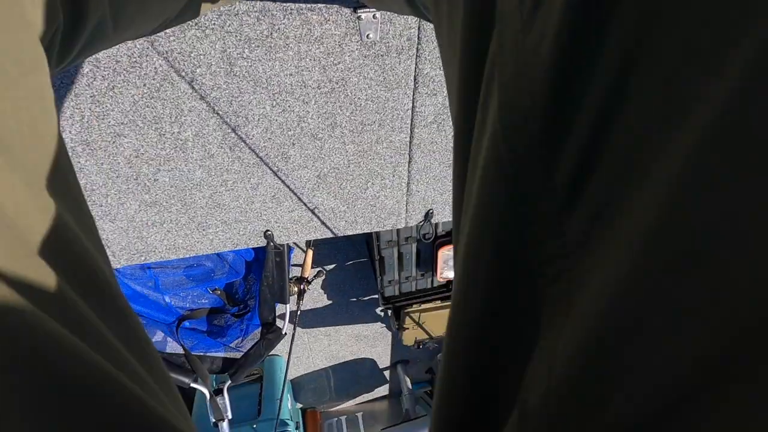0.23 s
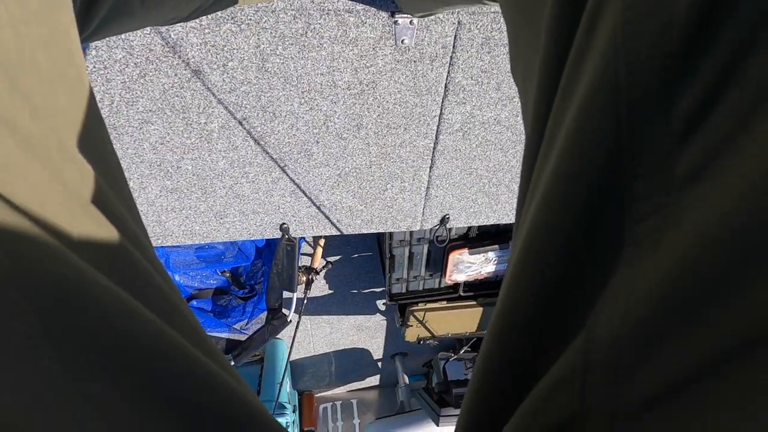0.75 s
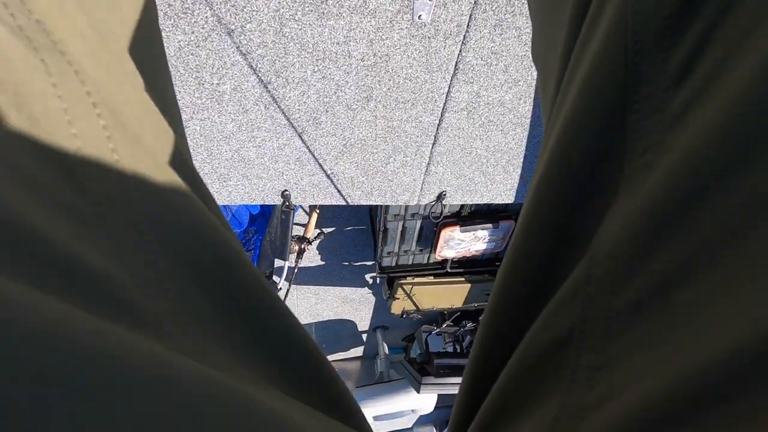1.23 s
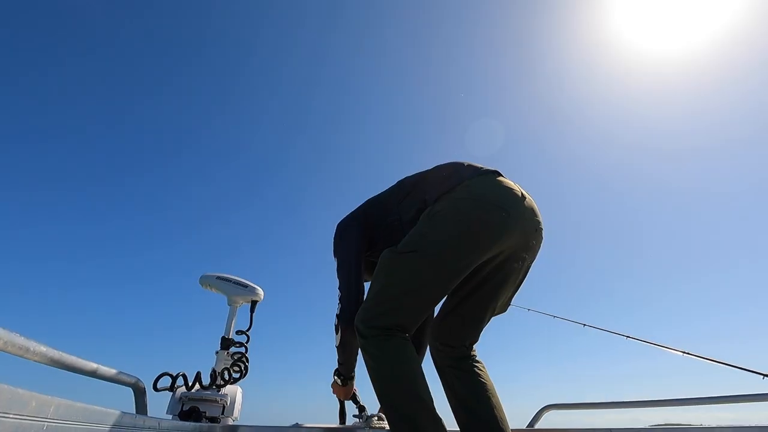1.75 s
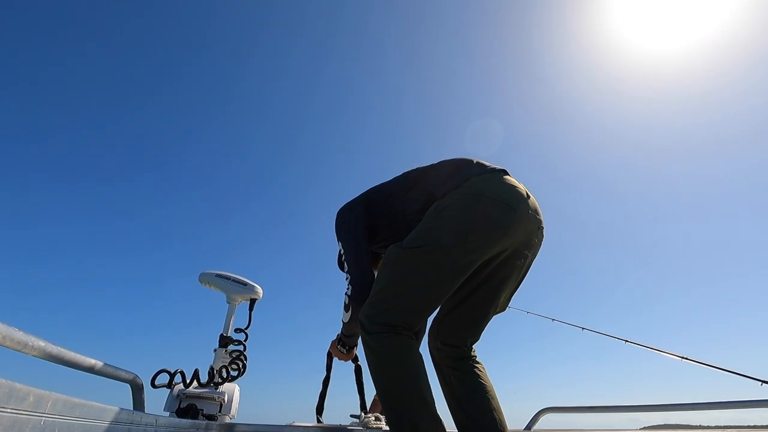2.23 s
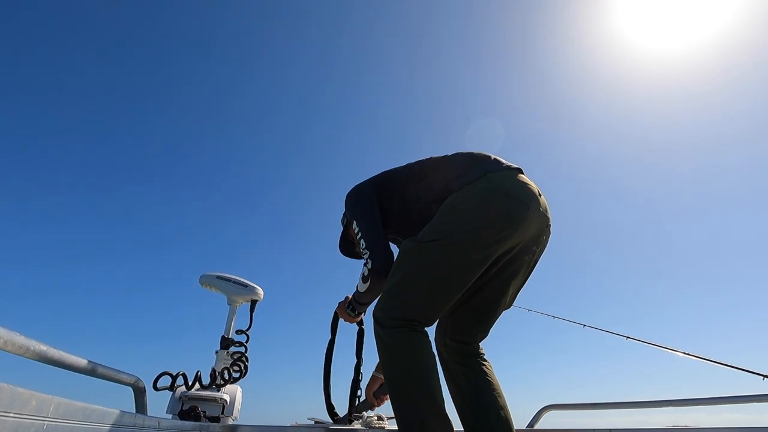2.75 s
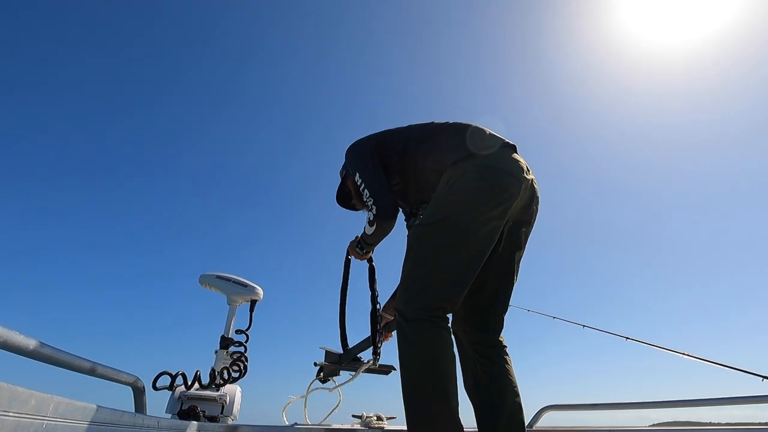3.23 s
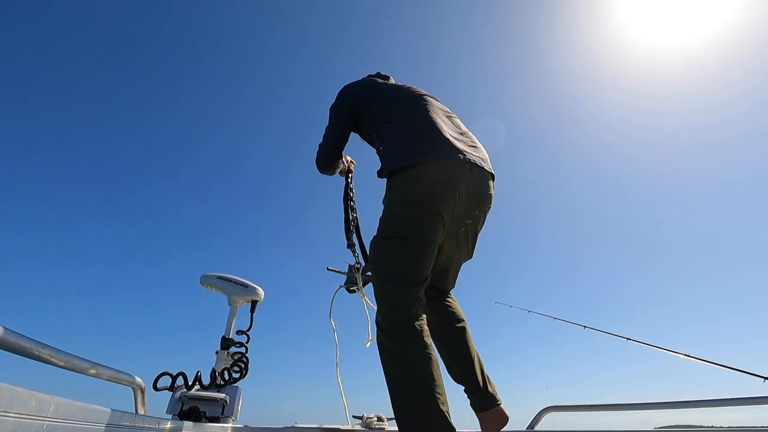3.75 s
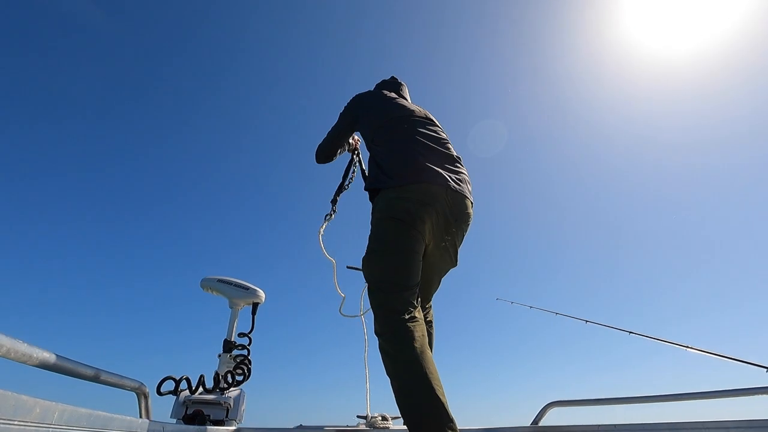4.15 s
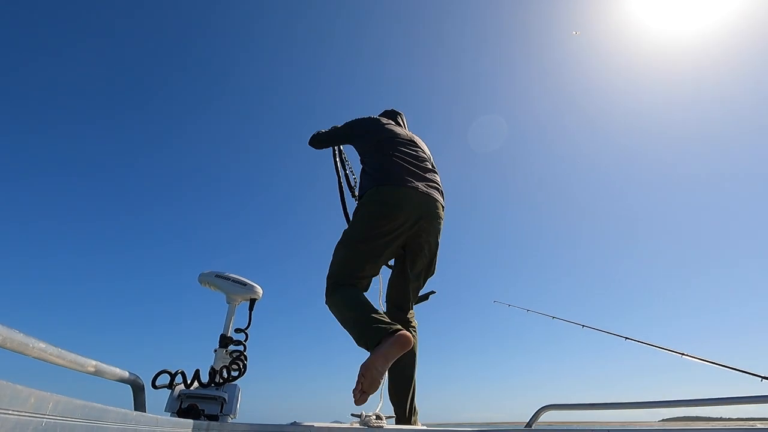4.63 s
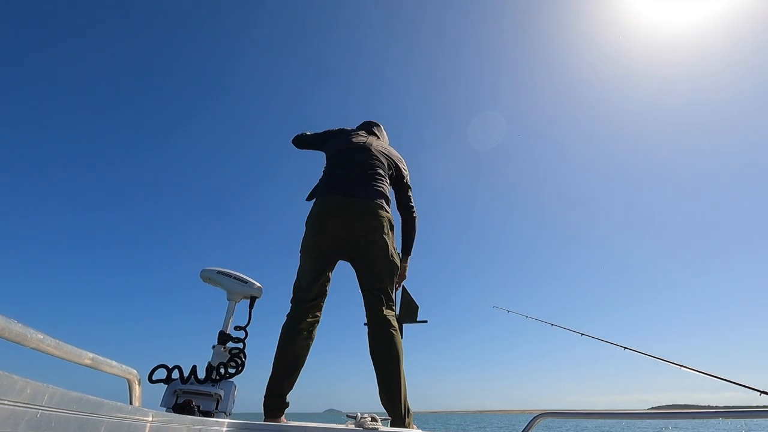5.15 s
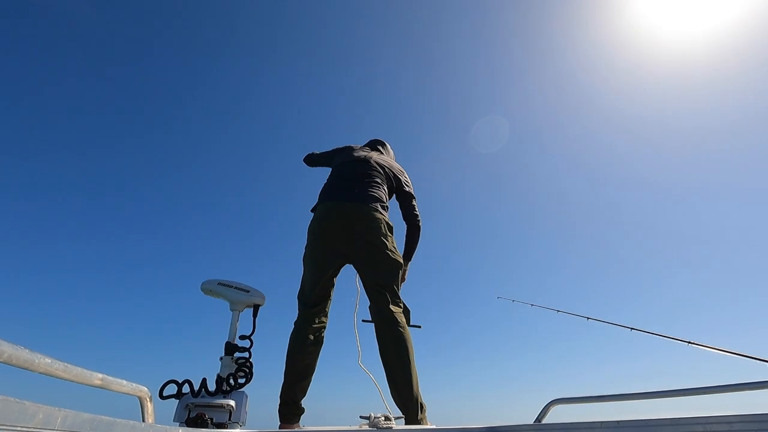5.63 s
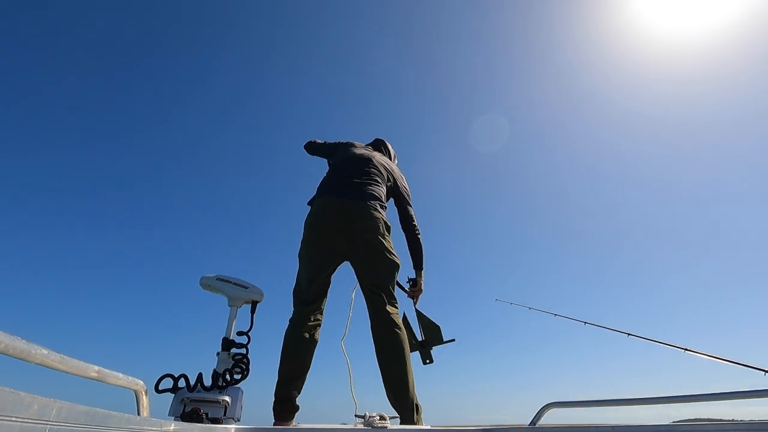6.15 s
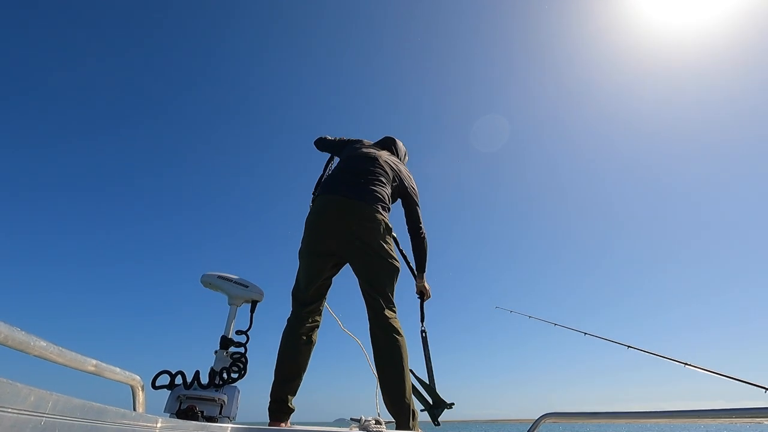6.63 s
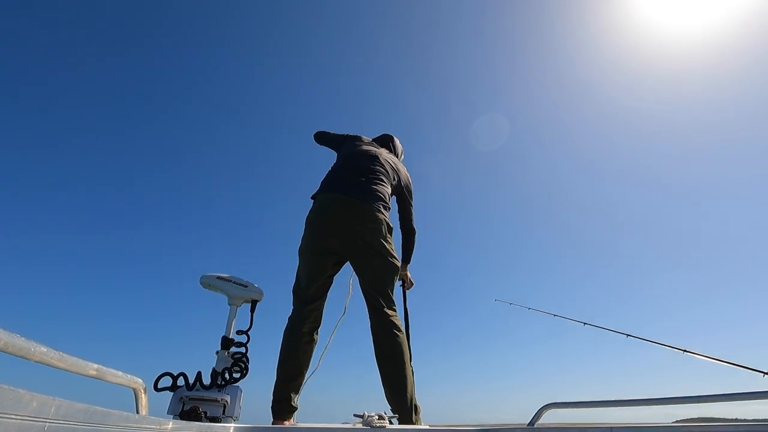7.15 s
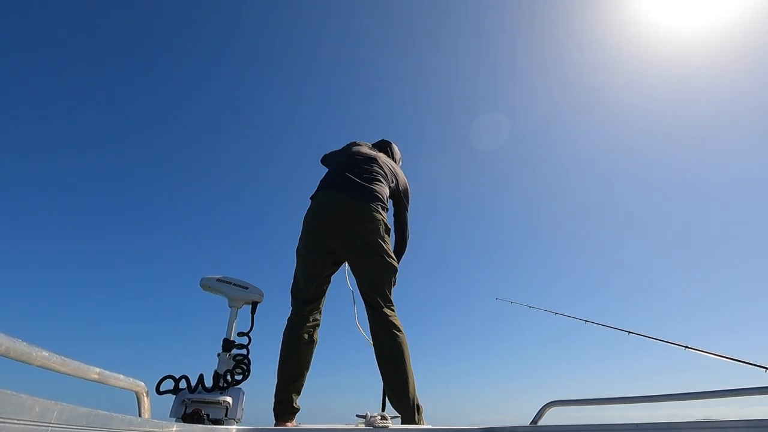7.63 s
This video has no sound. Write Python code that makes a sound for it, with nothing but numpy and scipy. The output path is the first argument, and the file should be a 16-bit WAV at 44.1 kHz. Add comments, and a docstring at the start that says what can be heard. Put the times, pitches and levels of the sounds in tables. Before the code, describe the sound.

Metal anchor gear clangs and scrapes on an aluminium boat's bow, links ticking, deck knocking, cloth rustling under soft wind rumble.

```python
"""Anchor over the bow

A steel anchor and its chain are lifted from the deck locker of a small metal boat and let down over the bow.
The anchor clangs (fading sine modes) and scrapes (gritty noise through the same modes).
Links tick on the rail (click and short ring) and the hull thuds under feet and gear (low fading sines).
Wind buffets the microphone (low noise), water and clothing rustle (noise with tiny knocks),
and a faint squeak (gliding sines) joins in."""
import sys
import numpy as np
from scipy import signal
from scipy.fft import rfft, irfft, next_fast_len
from scipy.io import wavfile
from scipy.ndimage import uniform_filter1d, map_coordinates

SR = 44100
rng = np.random.default_rng(int(sys.argv[2]) if len(sys.argv) > 2 else 0)


def level_to_linear(level):
    """Convert decibel levels to linear amplitude factors, elementwise."""
    exponent = np.asarray(level, float) / 20
    return 10 ** exponent


def unload_audio(sound):
    """Save the sound as a 16-bit wav file, at the path given as the first command line argument."""
    columns = np.transpose(np.atleast_2d(sound))
    # keep every value between -1 and 1, then stretch to whole-number steps
    steps = np.round(np.clip(columns, -1, 1) * 32767)
    wavfile.write(sys.argv[1], SR, steps.astype(np.int16))


N = 348390

# wind buffeting over time: t/s, level/dB
WIND_LEVEL = [(0, -41), (0.9, -40), (1.5, -44), (2.2, -41.5), (3.3, -43.5), (3.9, -37.5), (4.75, -42.5),
              (5.0, -50), (7.9, -51)]
# colour of the wind noise: f/Hz, relative level per Hz/dB
WIND_COLOUR = [(12, -4.5), (24, 6), (70, -1), (260, -12), (440, -120)]
# stir of rope, chain and cloth, with sudden lulls and starts: t/s, hull scuffing level/dB, rustle level/dB
STIR = [(0, -53, -54), (0.6, -47, -61.5), (1.4, -46, -57), (1.55, -65.5, -64.5), (1.62, -44, -62),
        (2.2, -47.5, -57), (3.12, -48.5, -55), (3.44, -63, -57), (4.3, -56, -54.5), (4.98, -51, -67.5),
        (5.5, -56, -51.5), (6.4, -48.5, -56.5), (6.5, -65.5, -69), (6.63, -47, -58.5), (7.05, -52.5, -59),
        (7.27, -78, -77), (7.36, -44, -48), (7.9, -49.5, -62.5)]
# feet and gear scuffing the deck: peak t/s, rise over 20 dB/s, fall over 20 dB/s, hull level/dB, rustle level/dB
SCUFF_SWELLS = [(0.193, 0.0084, 0.16, -29.5, -57), (0.387, 0.036, 0.25, -27.5, -63),
                (3.515, 0.11, 0.43, -43.5, -51), (3.774, 0.2, 0.074, -37, -47.5),
                (3.907, 0.058, 0.12, -33.5, -44.5), (4.195, 0.11, 0.08, -41, -48),
                (4.703, 0.22, 0.18, -30, -51), (5.487, 0.017, 0.048, -35, -46),
                (7.552, 0.31, 0.26, -55, -50.5)]
# colour of the scuffing carried by the hull: f/Hz, relative level per Hz/dB
HULL_COLOUR = [(59, 0), (100, -8), (309, -0.5), (600, -11.5), (2000, -37), (4400, -120)]
# colour of the rustle: f/Hz, relative level per Hz/dB
RUSTLE_COLOUR = [(410, -42.5), (700, -2.5), (1130, -11), (1800, -7.5), (4500, -11), (9000, -24.5),
                 (15800, -46)]
# the anchor's modes: f/Hz, relative level/dB, time to fade 60 dB when neither damped nor freed/s
ANCHOR_MODES = [(810, -17, .15), (1278, -7, .2), (1352, -5, .5), (1392, -4, .2), (1511, -2, .12),
                (1962, 0, .25), (2295, -6, .15), (2655, -7, .2), (3090, -8, .4), (3378, -8, .5),
                (3700, -4, .17), (3742, -4, .25), (4185, -8, .2), (4487, -3, .09), (4638, -4, .2),
                (4984, -.5, .3), (5483, -5, .3), (5782, -4, .25), (6230, -4, .16), (6800, -5, .18),
                (7205, -6, .18), (7520, -3, .12), (8260, -6, .12)]
# edges of the five families of modes, which each strike point drives differently: f/Hz
FAMILY_EDGES = [500, 1700, 2850, 4300, 5600, 10500]
# blows on the anchor, and one soft scrape at 6.04 s:
# t/s, relative level of the lowest family/dB, tilt per family/dB, favoured f/Hz, its lift/dB
CONTACTS = [(0.484, -38.5, -2.5, 4740, 19), (0.6482, -31, -2, 4470, 12), (0.7305, -41.5, -1.5, 4780, 20),
            (0.8311, -36.5, -1, 4700, 14.5), (1.032, -31.5, -2.5, 1330, 11), (1.184, -20.5, -1.5, 4720, 16),
            (1.221, -31, -19, 1500, 7), (1.256, -30, -6.5, 1590, 0), (1.304, -28, -0.5, 1962, 20),
            (1.4117, -43.5, -3.5, 3260, 24.5), (1.6205, -35.5, -7.5, 1962, 3),
            (1.654, -41.5, -4.5, 1962, 4.5), (1.702, -51, -1.5, 4470, 19), (1.754, -50.5, -4.5, 1460, 19),
            (1.8523, -37, -7.5, 1430, 4.5), (1.938, -43.5, -5, 1962, -1), (2.1, -42.5, -2.5, 3360, 10),
            (2.6806, -39.5, -8, 1460, 16.5), (2.6933, -41.5, -1.5, 4970, 21),
            (2.9163, -49.5, -1, 1330, 17.5), (3.039, -41, -5, 1500, 11.5), (4.2083, -32.5, -2.5, 3850, 8),
            (4.362, -35, -3, 5000, 6), (4.5432, -24, -6, 2000, 6.5), (4.793, -25, -3, 3400, 4),
            (5.1327, -25.5, -3.5, 1380, 2), (5.325, -34, -4.5, 5000, 14), (5.6429, -30.5, -1.5, 6000, 12.5),
            (5.7131, -28.5, -1, 7650, 9.5), (5.747, -31, -0.5, 3300, 7.5), (5.779, -16, -5.5, 1616, 13.5),
            (5.9198, -29, -4.5, 2350, 15), (6.0364, -33, -6, 1900, 1), (6.0658, -30.5, -5.5, 2100, 9),
            (6.333, -39.5, -6.5, 1300, 3.5)]
# thuds in the hull: t/s, relative level/dB, f/Hz
HULL_THUDS = [(0.487, -25, 246), (0.73, -24, 257), (0.839, -21.5, 259.5), (0.864, -19.5, 277.4),
              (1.034, -20.5, 278), (1.187, -11.5, 274), (1.228, -10.5, 281), (1.307, -21.5, 280),
              (1.582, -23, 402), (1.717, -16, 250), (1.974, -31, 331), (2.131, -28, 171.4),
              (2.266, -28.5, 760), (2.392, -27, 392), (2.992, -33.5, 193), (3.727, -17.5, 778),
              (4.485, -28.5, 507), (4.795, -21, 754), (5.778, -28, 820), (6.064, -28.5, 572),
              (6.625, -30, 483), (6.683, -33.5, 242), (7.023, -36.5, 583), (7.635, -27.5, 317)]
# links and rope fittings ticking on the rail: t/s, relative level/dB, f/Hz
RAIL_TICKS = [(2.496, -27, 7400), (2.532, -33, 8000), (2.582, -25, 7960), (2.781, -8, 8070),
              (2.787, -11, 8400), (2.819, -20.5, 8430), (3.758, -21.5, 1420), (3.883, -25.5, 1590),
              (5.477, -24, 8200), (5.571, -37.5, 6900), (5.658, -5.5, 5900), (5.923, -36.5, 8900),
              (5.96, -40, 8500), (5.995, -39, 7450), (6.103, -41, 9000), (6.892, -28.5, 8300),
              (7.325, -24, 4250), (7.371, -12, 3610), (7.386, -27, 890), (7.409, -24.5, 3040),
              (7.445, -29, 4870), (7.474, -12.5, 1420), (7.501, -22, 4670), (7.537, -21.5, 4000),
              (7.567, -20, 5420), (7.625, -31.5, 3670), (7.675, -35, 3530), (7.719, -28, 2670),
              (7.739, -20, 3350), (7.87, -38, 7060)]
# the anchor dragged over metal: t/s, relative level/dB
DRAG_LEVEL = [(2.52, -54), (2.6, -38.5), (2.645, -31.5), (2.7, -33.5), (2.76, -52.5)]
# the gliding squeak: t/s, f/Hz, level/dB
SQUEAK_GLIDE = [(4.22, 1090, -59), (4.34, 895, -59), (4.485, 985, -57)]
# side against mid while the sound is almost mono: f/Hz, level/dB
NARROW_SIDE = [(10500, -33), (12000, 0)]
# side against mid once the sound has opened out: f/Hz, level/dB
WIDE_SIDE = [(100, -21), (400, -23), (3000, -9.5), (12000, -4)]
# start and end of the opening out: t/s
OPENING = (5.4, 6.86)


def unit(x):
    """Scaled to rms 1."""
    return x / np.sqrt(np.mean(x ** 2) + 1e-20)


def along(points, hz):
    """Reads (Hz, value) points on a log frequency axis."""
    f, v = np.transpose(points)
    return np.interp(np.log(hz + 1), np.log(f + 1), v)


def curves(rows):
    """One value per sample for each column after the time; -120 outside the listed times."""
    s, *columns = np.transpose(rows)
    t = np.arange(N) / SR
    return [np.interp(t, s, c, left=-120, right=-120) for c in columns]


def wobble(rate):
    """A smooth random curve with rate knots a second."""
    knots = rng.standard_normal(int(N * rate / SR) + 4)
    return map_coordinates(knots, [np.arange(N) * rate / SR])


def filtered(x, response):
    """x passed through a complex response, given as a function of frequency."""
    m = next_fast_len(N + SR // 2)
    return irfft(rfft(x, m) * response(np.fft.rfftfreq(m, 1 / SR)), m)[..., :N]


def band(x, lo_hz, hi_hz):
    """Causal band-pass."""
    return signal.sosfilt(signal.butter(2, [lo_hz, hi_hz], "band", fs=SR, output="sos"), x)


def fade(t, seconds):
    """Exponential decay that falls 60 dB in the given time."""
    return level_to_linear(-60 * t / seconds)


def soft_start(t, seconds):
    """Rounded onset: a gain rising from 0 towards 1."""
    return 1 - np.exp(-t / seconds)


def add(track, s, sound):
    """Mixes a sound into the track at s seconds."""
    part = track[..., round(s * SR):round(s * SR) + sound.shape[-1]]
    part += sound[..., :part.shape[-1]]


def rush(spectrum, patchy_db, envelope):
    """Coloured noise of rms 1 under an envelope, with random patches of gain in time and pitch."""
    z = signal.stft(rng.standard_normal(N) * envelope, nperseg=256)[2]
    field = uniform_filter1d(rng.standard_normal(z.shape), 5, 0)
    field = uniform_filter1d(field, 6, 1)
    x = signal.istft(z * level_to_linear(patchy_db * unit(field)), nperseg=256)[1][:N]
    return unit(filtered(x, lambda hz: level_to_linear(along(spectrum, hz))))


def grains(rate, mid_hz, spread, cycles, size_db):
    """Random small contacts, together of rms 1, each a damped ring at its own pitch; rate is per second."""
    draw = rng.random((round(rate * N / SR), 3))
    hz = mid_hz * np.exp(spread * rng.standard_normal((len(draw), 1)))
    hz = np.clip(hz, 100, SR / 3)
    t = np.arange(round(0.038 * SR)) / SR
    size = level_to_linear(-size_db * np.log(0.0032 + draw[:, 1:2]))  # a few are much larger than the rest
    sign = np.sign(draw[:, 2:] - .5)
    rings = sign * size * np.sin(2 * np.pi * hz * t)
    rings *= fade(t, cycles / hz) * soft_start(t, 2 / hz)
    at = (draw[:, :1] * N).astype(int) + np.arange(len(t))
    return unit(np.bincount(at.ravel(), rings.ravel(), minlength=N)[:N])


def wind():
    """Lumps of low pressure on the microphone: low noise with uneven strength."""
    lumps = rush(WIND_COLOUR, patchy_db=1.5, envelope=level_to_linear(6.2 * wobble(16)))
    return level_to_linear(curves(WIND_LEVEL)[0] + 1.3 * wobble(11)) * lumps


def stirring():
    """Hull and rustle levels in dB: the stir, with sudden lulls and starts, and every scuff swelling out of it."""
    t = np.arange(N) / SR
    power = level_to_linear(2 * np.array(curves(STIR)))  # doubled dB turn amplitude into power
    for s, rise, fall, *db in SCUFF_SWELLS:
        drop_db = 20 * np.maximum((s - t) / rise, (t - s) / fall)
        power += level_to_linear(2 * (np.array(db)[:, None] - drop_db))
    return 10 * np.log10(power)


def shuffle():
    """Scuffing carried by the hull and a rustle of rope, links and cloth: noise full of small knocks."""
    hull_db, rustle_db = stirring()
    unrest = wobble(26)

    scuff = rush(HULL_COLOUR, patchy_db=2.0, envelope=level_to_linear(4.2 * wobble(60)))
    knocks = grains(rate=160, mid_hz=571.0, spread=0.498, cycles=31.0, size_db=5)
    hull = level_to_linear(hull_db + 0.27 * unrest) * (scuff + 0.39 * knocks)

    rustle = rush(RUSTLE_COLOUR, patchy_db=1.5, envelope=level_to_linear(1.5 * wobble(120)))
    crackle = grains(rate=77, mid_hz=5900, spread=0.58, cycles=3.5, size_db=3.0)
    rattle = grains(rate=700, mid_hz=1900, spread=0.666, cycles=33, size_db=5.0)
    brisk = level_to_linear(1.1 * (rustle_db + 53))  # brisker movement rattles more
    cloth = rustle + brisk * (rattle + 0.19 * crackle)
    return hull + level_to_linear(rustle_db + 2.0 * unrest) * cloth


def chatter(count, t):
    """Uneven gain for each mode, 70 knots a second: loose parts touch the ringing steel."""
    knot, part = np.divmod(t * 70, 1)
    knot = knot.astype(int)
    gain = level_to_linear(4.47 * rng.standard_normal((count, knot[-1] + 2)))
    return gain[:, knot] * (1 - part) + gain[:, knot + 1] * part


def link_rings(level_db, t):
    """Sixteen links and shackles ring briefly at random pitches of their own."""
    draw = rng.random((16, 2))
    hz = 700 * 15 ** draw[:, :1]
    family = np.searchsorted(FAMILY_EDGES[:-1], hz[:, 0]) - 1
    decay = fade(t, 0.016 + 0.19 * draw[:, 1:])
    return (level_to_linear(level_db[family] - 15.0) * decay * np.sin(2 * np.pi * hz * t)).sum(0)


def clangs():
    """Each contact, with weak bounces, rings the anchor at new strengths, most near the favoured pitch."""
    hz, mode_db, t60 = np.transpose(ANCHOR_MODES)[:, :, None]
    t = np.arange(SR // 2) / SR
    ring, clatter = np.zeros(N), np.zeros((len(FAMILY_EDGES) - 1, N))
    step = np.arange(len(clatter))[:, None]
    family = np.searchsorted(FAMILY_EDGES, hz[:, 0]) - 1
    family_power = np.bincount(family, level_to_linear(2 * mode_db[:, 0]))
    share_db = mode_db - 10 * np.log10(family_power[family, None])  # a family's modes share its energy

    for s, db, tilt_db, favoured_hz, lift_db in CONTACTS:
        level_db = db + tilt_db * step
        free = .6 if s < 1.5 else 1.1  # lying in the locker damps the ring, hanging frees it
        near = np.exp(-(np.log(hz / favoured_hz) / 0.099) ** 2)
        chance_db = 4.87 * rng.standard_normal(hz.shape)
        strength = level_to_linear(level_db[family] + share_db + lift_db * near + chance_db)

        # much of the energy leaves while the parts still touch
        decay = fade(t, 0.03) + 0.22 * fade(t, t60 * free)
        decay = decay * chatter(len(hz), t)
        detuned_hz = hz * (1 + 0.0013 * rng.standard_normal(hz.shape))
        modes = (strength * decay * np.sin(2 * np.pi * detuned_hz * t)).sum(0)
        modes += link_rings(level_db, t)
        modes *= soft_start(t, 0.0038)
        add(ring, s, 1.49 * modes)
        for late, size in rng.random((5, 2)):  # the parts bounce weakly afterwards
            add(ring, s + 0.061 * late ** 2, 0.51 * size * modes)

        # nearby links clatter along: noise in each family's band
        burst = fade(t, 0.043) + 0.11 * fade(t, 0.5 * free)
        burst = burst * soft_start(t, 0.0085)
        favoured = step == np.searchsorted(FAMILY_EDGES, favoured_hz) - 1
        loose_db = level_db + 0.64 * lift_db * favoured
        noise = rng.standard_normal((len(clatter), len(t)))
        add(clatter, s - .006, level_to_linear(loose_db + 2.5) * burst * noise)

    bands = zip(clatter, FAMILY_EDGES, FAMILY_EDGES[1:])
    return ring + sum(band(noise, lo, hi) for noise, lo, hi in bands)


def thuds():
    """A hull panel rings low, fading 60 dB in 25 cycles, with a weaker neighbour mode and a soft start."""
    out, t = np.zeros(N), np.arange(round(.3 * SR)) / SR
    for s, db, hz in HULL_THUDS:
        neighbour_hz = hz * rng.uniform(1.6, 2.1)
        panel = np.sin(2 * np.pi * hz * t) + 0.083 * np.sin(2 * np.pi * neighbour_hz * t)
        add(out, s, level_to_linear(db + 4.5) * fade(t, 25 / hz) * soft_start(t, 0.0056) * panel)
    return out


def ticks():
    """A broad click of noise with a brief ring at the link's pitch."""
    out, t = np.zeros(N), np.arange(round(.06 * SR)) / SR
    for s, db, hz in RAIL_TICKS:
        ping = np.sin(2 * np.pi * hz * t) + .4 * np.sin(3 * np.pi * hz * t)
        ping = ping * fade(t, .012)
        click = band(rng.standard_normal(len(t)), 0.22 * hz, 8700)
        click = click * (fade(t, 0.01) + 0.14 * fade(t, 0.13))
        add(out, s, level_to_linear(db) * (.35 * ping + 0.27 * click) * soft_start(t, 0.00033))
    return out


def drag():
    """Gritty friction keeps the anchor's modes ringing, the middle ones most."""
    push = level_to_linear(curves(DRAG_LEVEL)[0])
    grit = unit(rng.standard_normal(N) * level_to_linear(4.5 * wobble(300) + 3 * wobble(50)))

    def tone(f):
        """Sum of resonances, narrower for modes that ring longer."""
        body = sum(level_to_linear(db) / np.sqrt(t60) * 1j * f / (hz * hz - f * f + 1j * f * 6 / t60)
                   for hz, db, t60 in ANCHOR_MODES)
        return body * level_to_linear(along([(1000, -8.0), (3300, 21), (6000, -7.5)], f))

    level = np.sqrt(np.mean(filtered(grit, tone) ** 2))
    ringing = filtered(grit * push, tone) / level
    scrape = band(grit * push, 2200, 5500)
    return level_to_linear(5.0) * ringing + level_to_linear(-11.5) * scrape


def squeak():
    """A faint gliding squeak: a sine and its third partial, equally strong."""
    hz, db = curves(SQUEAK_GLIDE)
    phase = 2 * np.pi * np.cumsum(hz) / SR
    return level_to_linear(db) * (np.sin(phase) + np.sin(3 * phase))


def scene():
    """Left and right differ by a phase-scrambled copy of the sound, at first mainly in the top octave."""
    mid = wind() + shuffle() + clangs() + thuds() + ticks() + drag() + squeak()
    knots = rng.uniform(-np.pi, np.pi, size=60)

    def side_copy(shape):
        """The mid sound with scrambled phase and its own colour."""
        def response(hz):
            turn = np.interp(hz, np.linspace(0, SR / 2, len(knots)), knots)
            top = hz > NARROW_SIDE[0][0]
            scramble = np.exp(1j * turn) - 0.89 * top  # the right side hears more of the top octave
            return level_to_linear(along(shape, hz)) * scramble
        return filtered(mid, response)

    wide = np.interp(np.arange(N) / SR, OPENING, [0, 1])
    side = (1 - wide) * side_copy(NARROW_SIDE) + wide * side_copy(WIDE_SIDE)
    return np.array([mid + side, mid - side])


def top_cut(x):
    """Nothing passes above the cut-off."""
    return signal.sosfilt(signal.butter(12, 15850, fs=SR, output="sos"), x)


def record(dry):
    """Turns the finished two-channel mix into the sound to be saved."""
    return top_cut(dry)


dry = scene()
out = record(dry)
unload_audio(out)
```